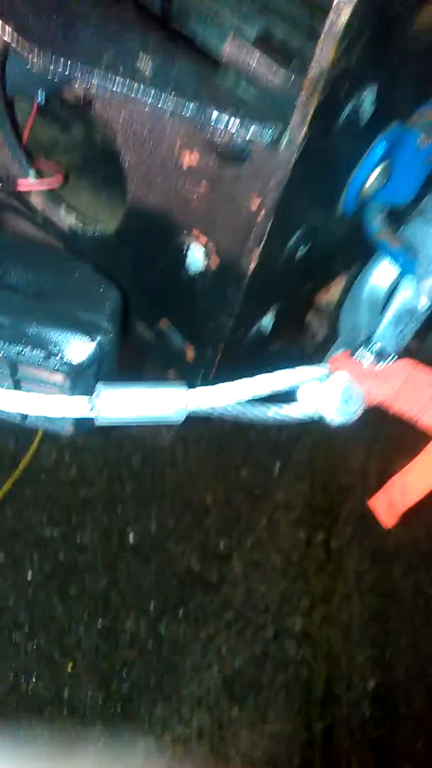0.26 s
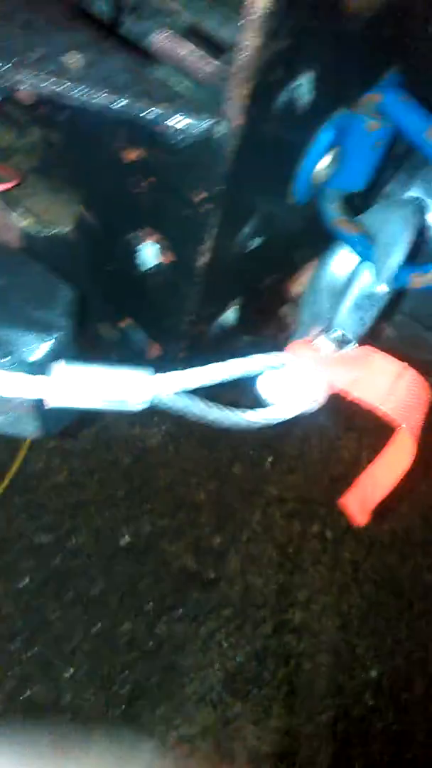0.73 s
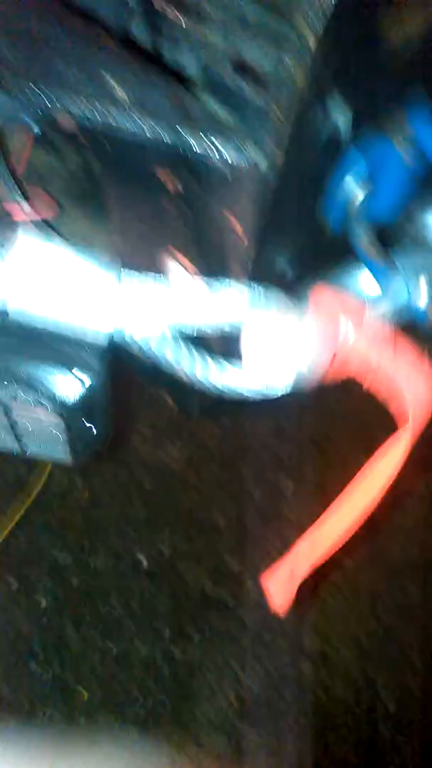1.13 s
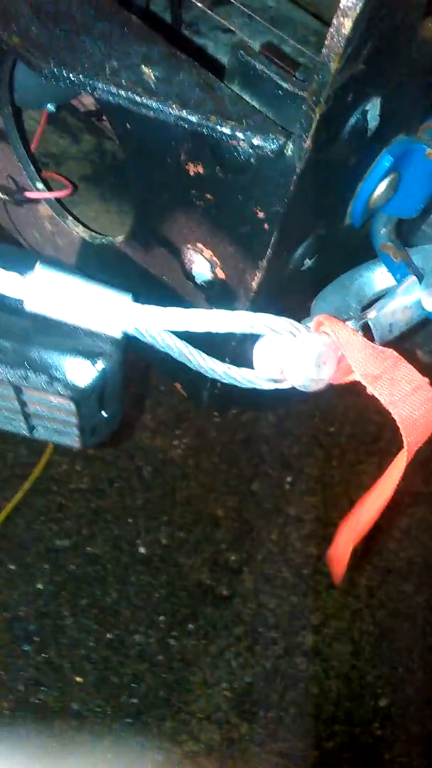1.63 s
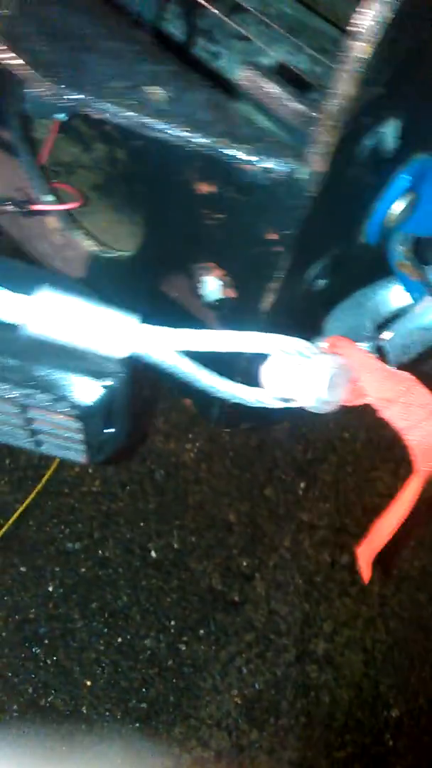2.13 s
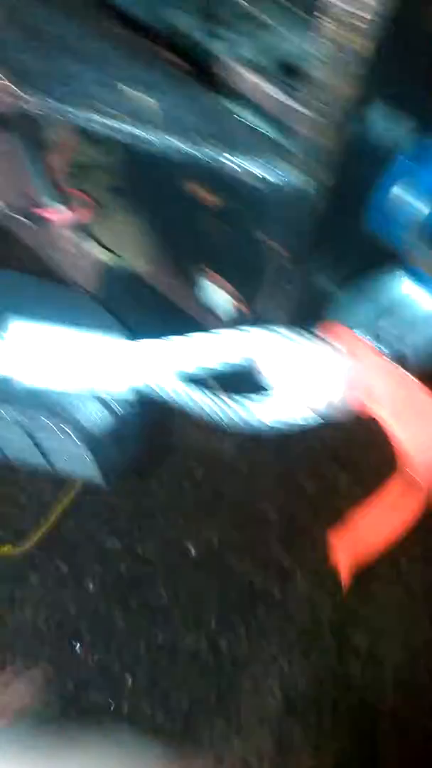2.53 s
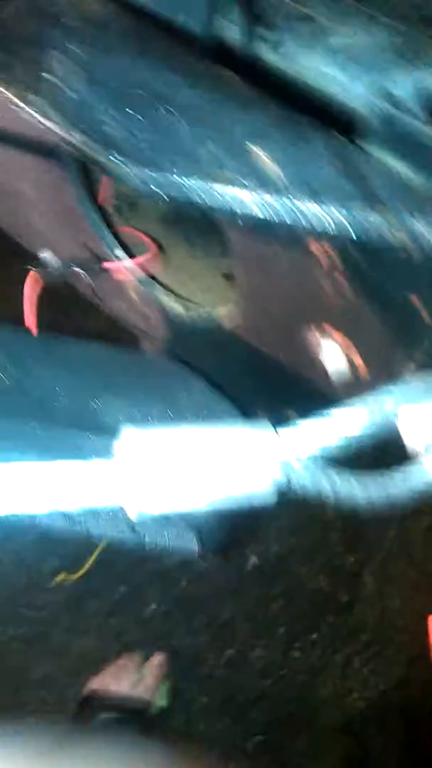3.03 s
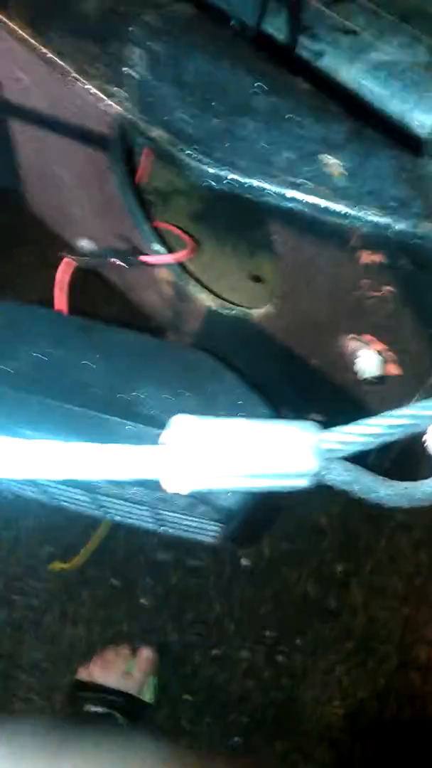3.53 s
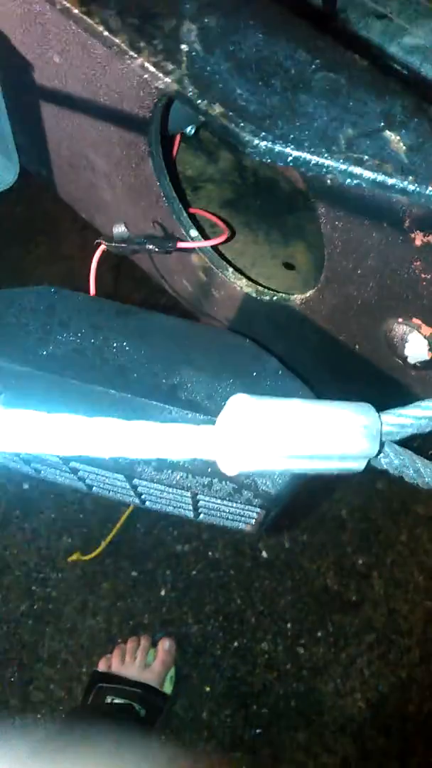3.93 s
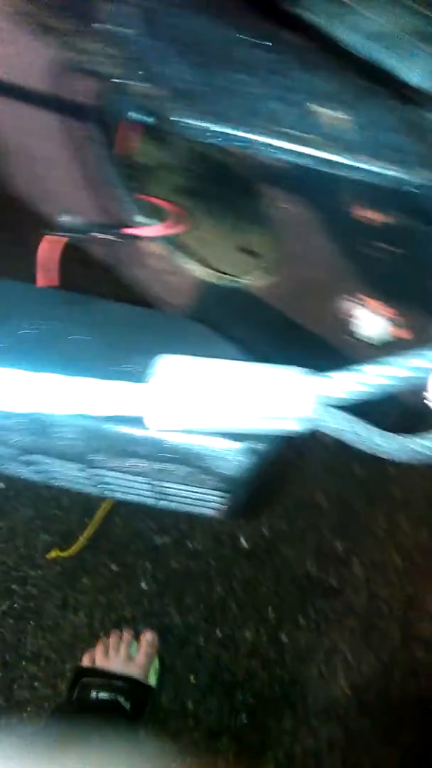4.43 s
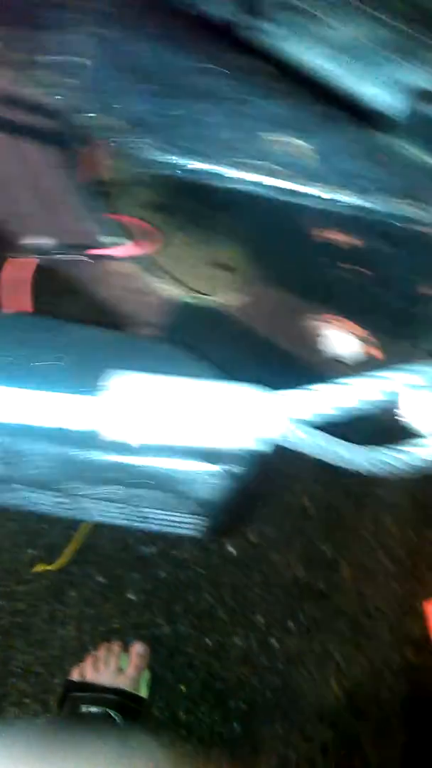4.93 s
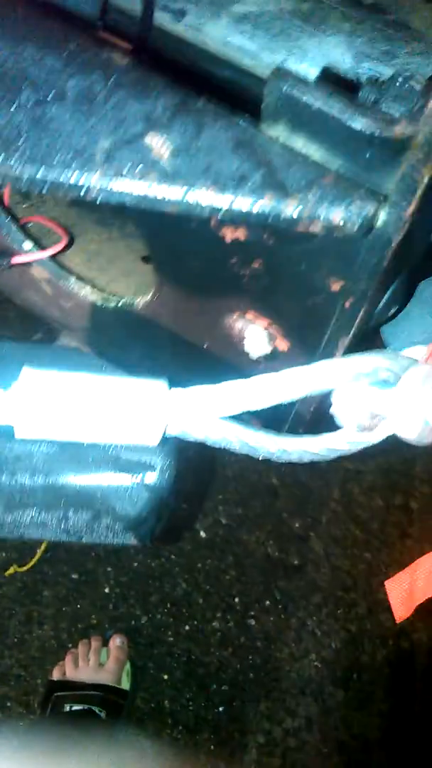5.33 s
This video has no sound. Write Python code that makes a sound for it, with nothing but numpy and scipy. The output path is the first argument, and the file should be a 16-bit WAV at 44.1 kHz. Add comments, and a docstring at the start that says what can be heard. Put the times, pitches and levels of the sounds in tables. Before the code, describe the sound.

A steel cable and hook scrape and clink, then an electric winch clacks on and runs with a steady whine.

```python
"""Bumper winch at night

Close on the electric winch of a parked vehicle, in mono, over a low night rumble. The steel cable
scrapes and sets the bumper ringing; hook and shackle clink as they are handled. Then the solenoid
clacks and the motor spins up: commutator whine, shaft hum and planetary gears sweep through the
housing's resonances, with the brushes hissing on top."""
import sys
import numpy as np
from scipy import signal
from scipy.fft import rfft, irfft, next_fast_len
from scipy.io import wavfile

SR = 44100
rng = np.random.default_rng(int(sys.argv[2]) if len(sys.argv) > 2 else 0)


def digitize_waveform(pressure):
    """Quantize a signal to 16-bit integers and store it at the path in sys.argv[1].

    Rows of a 2-D input are taken as channels; values are limited to [-1, 1].
    """
    field = np.atleast_2d(pressure).T
    bounded = np.clip(field, -1, 1)
    quanta = np.round(bounded * 32767).astype(np.int16)
    wavfile.write(sys.argv[1], SR, quanta)


N = 245857
TIME = np.arange(N) / SR

# shaft unbalance and overtones: cycles per turn, level/dB at full speed
SHAFT_HUM = [(1, -40), (6, -49), (9, -52), (10, -45), (11, -43), (12, -45)]
# planetary tooth mesh and sidebands: cycles per turn, level/dB at full speed
GEAR_MESH = [(1.19, -43), (2.42, -47), (4.53, -48), (9.58, -45), (10.58, -41), (10.83, -47)]
# commutator overtones and once-a-turn sidebands: cycles per turn, level/dB at full speed
COMMUTATOR_WHINE = [(25, -52), (26, -51), (27, -38.5), (28, -52), (36, -47), (37, -52), (51, -49),
                    (55, -46), (56, -41), (57, -42), (58, -35.5), (59, -42), (60, -47), (61, -47),
                    (63, -46), (66, -45), (70, -43), (77, -47), (80, -52), (81, -50), (82, -46), (84, -48),
                    (85, -46), (86, -50), (87, -47)]
# lead tones and their narrow resonances: cycles per turn, f/Hz, half width/Hz, base level/dB, boost/dB
LEAD_FLARES = [(3, 236, 19, -46.5, 10.5), (4, 343.3, 4.7, -49, 12.5), (5, 432.5, 4.3, -48.5, 10.5),
               (11.58, 989, 14, -45.5, 12), (29, 2362, 72, -54, 21.5), (29, 2518, 40, -53, 12.5)]
# housing resonances: f/Hz, width/Hz, boost/dB
HOUSING_MODES = [(235, 40, 16), (345, 25, 8), (435, 20, 12), (985, 110, 14), (2335, 120, 15),
                 (5050, 300, 13)]
# EQ of the gear rumble: f/Hz, level/dB
RUMBLE_EQ = [(30, -9), (70, -12), (110, 1), (150, -9), (215, 4), (300, -3), (420, 1), (560, -3), (780, -1),
             (950, 2), (1150, -10.5), (2000, -11.5), (3500, -14.5), (6000, -42.5)]
# EQ of the brush hiss: f/Hz, level/dB
BRUSH_EQ = [(1000, -9.5), (3000, -16.5), (4200, -10.5), (5200, -9), (5600, -2.5), (5900, -3.5), (6250, 2.5),
            (6650, -12), (7400, -13.5), (8500, -18), (10000, -30), (13000, -44), (15500, -91)]
# fader ride on the brush hiss: t/s, level/dB
BRUSH_RIDE = [(3.66, -33), (3.76, -29), (4.3, -27), (4.56, -25.5), (4.87, -28), (5.1, -23.5), (5.42, -25.5),
              (5.57, -26)]
# the solenoid closes and bounces: t/s, level/dB, t60/s
PLUNGER_HITS = [(3.6337, -17.5, 0.022), (3.636, -11, 0.021), (3.6415, -18.5, 0.041)]
# modes of the solenoid can: f/Hz, relative level/dB, t60/s
CAN_MODES = [(429, -3, 0.058), (777, -9, 0.15), (2260, -10, 0.11), (4060, 0, 0.043), (4820, -5, 0.083),
             (5740, 4, 0.048), (6210, 7, 0.038), (7200, -5, 0.027)]
# EQ of plunger hits and cable knocks: f/Hz, level/dB
CRACK_EQ = [(100, -21), (450, -6.5), (1200, -11.5), (2500, -8), (4200, 5), (6000, -2.5), (7500, -10),
            (10000, -12.5), (15500, -29.5)]
# cable drags over steel: t/s, t60/s, rasp level/dB, bumper drive/dB
CABLE_SCRAPES = [(-.03, 0.73, -48, -62), (0.325, .13, -47, -45.5), (0.387, 0.087, -46, -40.5),
                 (.484, 0.17, -42.5, -42.5), (.752, 0.35, -39.5, -37.5), (0.813, .17, -22, -24.5),
                 (1.014, 0.41, -42, -41.5), (1.235, 0.15, -57, -53), (2.07, 0.64, -56.5, -50.5),
                 (2.279, 0.13, -34.5, -35), (2.409, 0.93, -47.5, -42.5), (2.588, 0.19, -30, -40),
                 (2.616, 0.13, -31, -58), (2.72, .3, -46, -42.5), (2.79, 0.15, -60, -48),
                 (2.875, 0.2, -56, -68.5), (3.05, 0.37, -52.5, -67), (3.115, 0.98, -53, -77),
                 (5.41, 0.34, -26.5, -29)]
# EQ of the rasping strands: f/Hz, level/dB
RASP_EQ = [(700, -6), (1500, 3.5), (2400, 3.5), (3300, 3), (4600, 2), (6000, 4), (7500, -9.5), (10000, -17),
           (15000, -36)]
# dry knocks of cable turns and fittings: t/s, level/dB
CABLE_KNOCKS = [(0.3405, -47), (.491, -39), (.765, -27), (.806, -17), (0.8462, -18), (1.1374, -45),
                (1.2135, -47.5), (1.515, -44.5), (2.18, -45), (2.616, -29), (2.785, -40), (3.1049, -38.5),
                (3.147, -41), (3.6115, -33.5), (4.595, -20), (5.073, -31), (5.103, -24), (5.438, -12)]
# sheet-steel modes of the bumper: f/Hz, relative level/dB, t60/s
BUMPER_MODES = [(350, -6.5, 0.23), (525, -1, 0.086), (622.5, -3.5, 0.23), (740, -4.5, 0.095),
                (940, 4.5, 0.039), (1183, -6, 0.085), (1420, -8, 0.12), (2060, -27, 0.067),
                (2386, -3.5, .09), (3600, -25, 0.072)]
# EQ of the bumper's dull body: f/Hz, level/dB
BODY_EQ = [(60, -3), (200, 6), (450, 7.5), (700, 4), (1100, -2), (1600, -17), (3000, -56.5)]
# the hook swings against the bumper: t/s, level/dB, contact time/s
HOOK_CLUNKS = [(0.86, -25, 0.0042), (1.209, -49.5, 0.0025), (2.315, -43, 0.0082), (2.611, -36.5, 0.0035)]
# modes of the hook: f/Hz, relative level/dB, t60/s
HOOK_MODES = [(510, -11, .2), (1020, -14, .14), (1875, -8, .11), (2105, -8, .09), (2315, -13, .12),
              (2995, 0, .11), (3130, -8, .08), (4585, -1, .17), (6740, -11, .19), (9370, -26, .33)]
# the cable eye slips in the hook: t/s, ring level/dB, rasp level/dB, ring time factor
EYE_SLIPS = [(.743, -40, -38.5, .6), (0.925, -30, -34.5, 1.03), (2.194, -48, -43, 1),
             (2.279, -31.5, -43, 1.5), (2.362, -36.5, -45.5, 0.99), (2.503, -29, -42.5, 0.38),
             (2.532, -35.5, -67, 0.4), (4.432, -13, -30.5, .45)]
# the shackle pin clinks: t/s, ring level/dB, tightness 0-1
PIN_CLINKS = [(0.8188, -10, 0), (.9495, -36, .8), (.994, -36, .9), (1.0424, -30, 0.93), (1.0828, -36, .9),
              (2.124, -45, 1), (2.211, -35, 1), (2.312, -30.5, 1), (2.363, -40, 1), (2.413, -28.5, 0.93),
              (2.4614, -32, 0.8), (2.4707, -15, 0), (2.543, -32.5, 0.09), (2.5763, -37, 0.9),
              (2.708, -29.5, 0.64), (2.754, -26.5, 0.53), (5.426, -15, 0.84)]
# EQ of the pin's click: f/Hz, level/dB
CLICK_EQ = [(2000, -1), (4200, -6), (5100, -2), (6300, 4.5), (7500, -8), (10000, -20), (15500, -40)]
# EQ of the night bed: f/Hz, level/dB
NIGHT_EQ = [(25, -36), (40, -10), (55, -3), (75, 1), (130, -7), (200, -3), (260, -12.5), (450, -16.5),
            (800, -17), (1300, -23.5), (2300, -32.5), (4000, -34), (6000, -31), (8000, -36.5), (15500, -40)]

SPIN_S, MOTOR_IN_S = 3.632, 3.648  # the shaft starts turning; its sound cuts in
FULL_HZ, COMMUTATOR_BARS = 86.5, 29  # shaft rate that counts as full speed; bars per turn


def winch():
    """The motor spins up; its tones are locked to the shaft and clear the noise near full speed."""
    speed = shaft_speed() * (1 + .0004 * walk(40))
    turns = np.cumsum(speed) / SR
    pace = speed / FULL_HZ
    motor = armature(speed, turns) + lead_tones(speed, turns)
    hum = shaft_tones(SHAFT_HUM, speed, turns, waver_db=2) * pace ** 5
    mesh = shaft_tones(GEAR_MESH, speed, turns, waver_db=3) * pace ** 8
    whine = shaft_tones(COMMUTATOR_WHINE, speed, turns, waver_db=2) * pace ** 3
    gears = mesh + gear_rumble(pace) + gear_squeak(turns, pace)
    fade_in = np.clip((TIME - MOTOR_IN_S) / .0022, 0, 1)
    return fade_in * (motor + hum + whine + gears + brushes(turns) + hook_shake(pace))


def shaft_speed():
    """Turns per second: a quick surge, a creep up to free speed and a brief sag under load."""
    free_hz, surge_share, surge_s, creep_s = 87.32, .61, .055, .286
    sag_hz, sag_at_s, sag_s = .9, 4.756, .167
    t = np.maximum(TIME - SPIN_S, 0)
    lag = surge_share * np.exp(-t / surge_s) + (1 - surge_share) * np.exp(-t / creep_s)
    return free_hz * (1 - lag) - sag_hz * np.exp(-((TIME - sag_at_s) / sag_s) ** 2)


def armature(speed, turns):
    """Starting current jolts the armature at every commutator bar; the octave above lingers."""
    bar_phase = 2 * np.pi * COMMUTATOR_BARS * turns
    jolt = undb(-32) * swell(MOTOR_IN_S, rise=.017, t60=.47) * housing(COMMUTATOR_BARS * speed)
    octave = undb(-38 + 4 * walk(25)) * swell(MOTOR_IN_S, rise=.066, t60=3)
    return jolt * np.sin(bar_phase + walk(400)) + octave * np.sin(2 * bar_phase + 1.5 * walk(400))


def lead_tones(speed, turns):
    """The strongest shaft, gear and commutator tones flare in resonances, rough from play in the teeth."""
    out = 0
    for order, hz, width, db, boost_db in LEAD_FLARES:
        detune = (order * speed - hz) / width
        flare_db = boost_db * np.exp(-detune ** 4)
        level = undb(db + flare_db + walk(70) + walk(10))
        out = out + level * np.sin(2 * np.pi * order * turns + .2 * walk(90))
    return np.sqrt(2) * out * (speed / FULL_HZ) ** 2


def shaft_tones(orders, speed, turns, waver_db):
    """Partials locked to the shaft; each wavers and swells as it crosses a housing resonance."""
    out, on = np.zeros(N), TIME > SPIN_S
    t, angle, knots = TIME[on], 2 * np.pi * turns[on], TIME[::64]
    for order, db in orders:
        resonance = housing(order * speed[::64]) / housing(order * FULL_HZ)
        gain = resonance * undb(db + waver_db * walk(9, knots))
        out[on] += np.interp(t, knots, gain) * np.sin(order * angle + 2 * np.pi * rng.random())
    return np.sqrt(2) * out


def housing(hz):
    """Gain of the resonant winch housing at a frequency."""
    peaks = sum(undb(db) ** 2 / (1 + (2 * (hz - f) / width) ** 2) for f, width, db in HOUSING_MODES)
    return np.sqrt(1 + peaks)


def brushes(turns):
    """The brushes hiss in uneven bursts, a touch harder at one place on the commutator."""
    level_db = np.interp(TIME, *np.transpose(BRUSH_RIDE)) + .45 * walk(14)
    chatter = undb(2 * walk(260) + .5 * np.sin(2 * np.pi * turns))
    return colour(grit(spread_db=1) * chatter, BRUSH_EQ) * undb(level_db)


def gear_rumble(pace):
    """The gears grind, growing slightly louder with speed."""
    full_db, standstill_drop_db = -32, 1
    grind = grit(spread_db=2.5) * undb(.99 * walk(120))
    return colour(grind, RUMBLE_EQ) * undb(full_db - standstill_drop_db * (1 - pace))


def gear_squeak(turns, pace):
    """Near full speed a dry gear squeaks in short fits, its pitch unsteady."""
    cycles_per_turn = 42.35
    fits_db = 7 * np.minimum(walk(24), 1.5)
    level = undb(-43.5 + fits_db) * np.clip((pace - .96) / .015, 0, 1)
    return np.sqrt(2) * level * np.sin(2 * np.pi * cycles_per_turn * turns + 1.8 * walk(50))


def solenoid():
    """The plunger slams home and bounces; its can rings."""
    hits = sum(undb(db) * swell(s, .00037, t60) for s, db, t60 in PLUNGER_HITS)
    can = undb(-19) * ring(PLUNGER_HITS[0][0], CAN_MODES, rise=.00069)
    return hits * colour(noise(), CRACK_EQ) + can


def cable():
    """Wire strands rasp over steel and set the bumper ringing; cable turns knock into place."""
    scrape_rise_s, slip_rise_s, slip_t60_s = .032, .0072, .26
    strokes = [(s, scrape_rise_s, t60, db, body_db) for s, t60, db, body_db in CABLE_SCRAPES]
    strokes += [(s, slip_rise_s, slip_t60_s, db, db - 1.5) for s, _, db, _ in EYE_SLIPS]
    rasp = sum(undb(db) * swell(s, rise, t60) for s, rise, t60, db, _ in strokes)
    drive = sum(undb(db) * swell(s, rise, 1.49 * t60) for s, rise, t60, _, db in strokes)
    knocks = sum(undb(db) * swell(s, rise=.0005, t60=.029) for s, db in CABLE_KNOCKS)
    catching = undb(2 * walk(200))
    strands = rasp * colour(grit(spread_db=2.5) * catching, RASP_EQ)
    bumper_ring = undb(-10) * resonate(drive * noise(), BUMPER_MODES)
    bumper_body = undb(-3) * drive * colour(noise() * catching, BODY_EQ)
    return strands + bumper_ring + bumper_body + knocks * colour(noise(), CRACK_EQ)


def shackle():
    """The pin gives a click and one high note: the tighter it sits, the higher, shorter and clickier."""
    loose_hz, tight_hz, loose_t60_s, tight_t60_s = 5710, 6270, .062, .015
    notes = clicks = 0
    for s, db, tight in PIN_CLINKS:
        hz = loose_hz + tight * (tight_hz - loose_hz)
        t60 = loose_t60_s * (tight_t60_s / loose_t60_s) ** tight
        notes = notes + ring(s, [(hz, db, t60)], rise=.0015)
        clicks = clicks + undb(db) * min(.03 / t60, 1) * swell(s, rise=.0006, t60=.008)
    return notes + clicks * colour(noise(), CLICK_EQ)


def hook():
    """The hook rings roughly as the cable eye slips and rubs in it, and clunks against the bumper."""
    rings = sum(undb(db) * ring(s, HOOK_MODES, rise=.0072, hold=hold) for s, db, _, hold in EYE_SLIPS)
    rubbing = undb(2 * walk(250) - .5)
    clunks = sum(undb(db) * ring(s, BUMPER_MODES, contact) for s, db, contact in HOOK_CLUNKS)
    return rings * rubbing + clunks


def hook_shake(pace):
    """The running winch shakes the hook into a faint metallic shimmer."""
    shimmer = sum(undb(db) * bandpass(noise(), hz, q=55) for hz, db, _ in HOOK_MODES)
    return undb(-41) * pace * unit(shimmer)


def reflections(x):
    """Add short scattered reflections from the bumper, the underbody and the ground."""
    tail = (noise() * swell(.0028, rise=.0011, t60=.047))[:SR // 3]
    return x + undb(-18) * signal.fftconvolve(x, tail / np.sqrt(np.sum(tail ** 2)))[:N]


def night():
    """A bed of low, distant rumble, gently wavering."""
    return colour(noise(), NIGHT_EQ) * undb(-50 + 1.47 * walk(4.18))


def ring(start, modes, rise, hold=1):
    """A struck steel part: decaying modes, a little different at each blow; hold scales the decay."""
    out = np.zeros(N)
    on = slice(*np.searchsorted(TIME, [start, start + .5]))
    t = TIME[on] - start
    for hz, db, t60 in modes:
        detuned_hz = hz * (1 + .00031 * rng.standard_normal())
        tone = np.sin(2 * np.pi * (detuned_hz * t + rng.random()))
        out[on] += undb(db) * envelope(t, rise, t60 * hold) * tone
    return out


def resonate(x, modes):
    """Drive a steel part's modes so that they ring on; the rms stays the same."""
    out = sum(undb(db) * np.sqrt(t60) * bandpass(x, hz, q=hz * t60 * np.pi / np.log(1000))
              for hz, db, t60 in modes)
    return unit(out) * np.sqrt(np.mean(x ** 2))


def bandpass(x, hz, q):
    """One resonant band of a sound."""
    return signal.lfilter(*signal.iirpeak(hz, q, SR), x)


def swell(start, rise, t60):
    """An envelope placed on the timeline; times in seconds."""
    out = np.zeros(N)
    on = slice(*np.searchsorted(TIME, [start, start + rise + 1.5 * t60]))
    out[on] = envelope(TIME[on] - start, rise, t60)
    return out


def envelope(t, rise, t60):
    """Linear attack to 1, then exponential decay."""
    return np.minimum(t / rise, 1) * np.exp(-np.log(1000) * np.maximum(t - rise, 0) / t60)


def colour(x, points):
    """EQ a sound through (f/Hz, level/dB) points, rolling off below the first; rms 1."""
    hz, db = np.transpose(points)
    size = next_fast_len(N)
    f = np.maximum(np.fft.rfftfreq(size, 1 / SR), 1)
    gain = undb(np.interp(np.log(f), np.log(hz), db)) * np.minimum(f / hz[0], 1) ** 2
    return unit(irfft(rfft(x, size) * gain, size)[:N])


def grit(spread_db):
    """Dense tiny clicks of unequal size."""
    return noise() * undb(spread_db * np.minimum(rng.exponential(size=N), 6))


def walk(rate, t=TIME):
    """Random modulator gliding through rate values a second; spread near 1."""
    steps = rng.standard_normal(4096)
    return 1.2 * np.interp(t * rate, np.arange(len(steps)), steps)


def noise():
    """White noise."""
    return rng.standard_normal(N)


def unit(x):
    """Scale to rms 1."""
    return x / np.sqrt(np.mean(x ** 2))


def undb(db):
    """Decibels to gain."""
    return 10 ** (np.asarray(db) / 20)


def scene():
    """Winch and rigging over the night bed, the same in both channels."""
    mono = winch() + reflections(solenoid() + cable() + shackle() + hook()) + night()
    return np.array([mono, mono])


def record(dry):
    """A steep low-pass trims the very top."""
    cutoff_hz = 15800
    return signal.sosfilt(signal.ellip(8, .2, 70, cutoff_hz, fs=SR, output="sos"), dry)


dry = scene()
out = record(dry)
digitize_waveform(out)
```